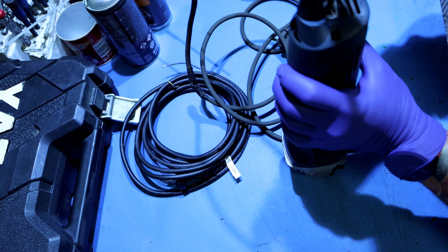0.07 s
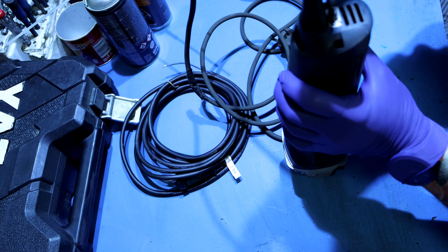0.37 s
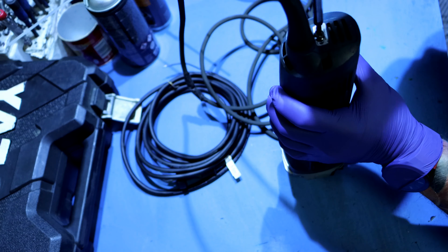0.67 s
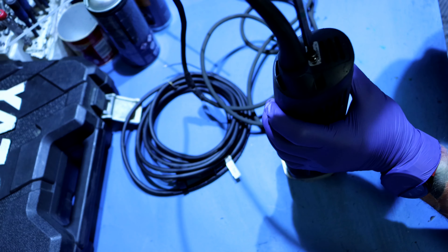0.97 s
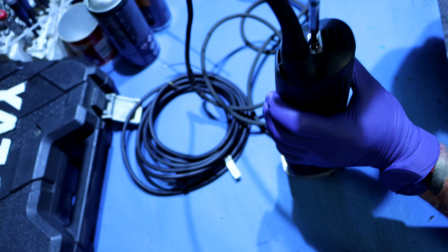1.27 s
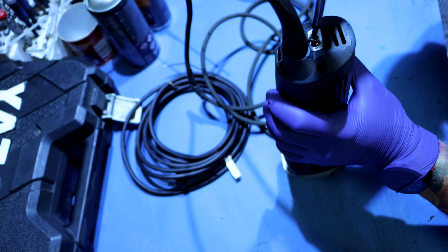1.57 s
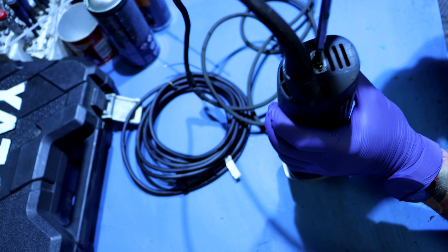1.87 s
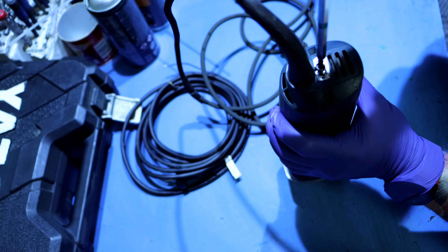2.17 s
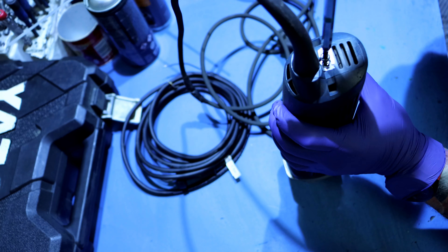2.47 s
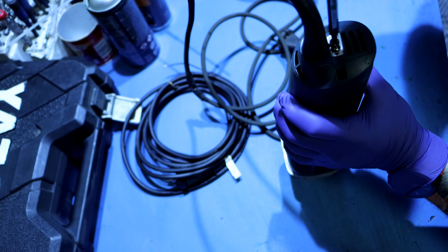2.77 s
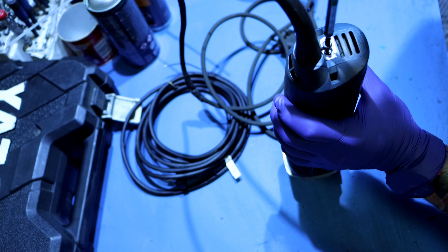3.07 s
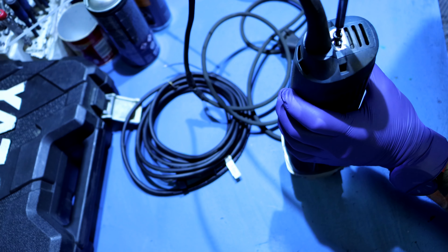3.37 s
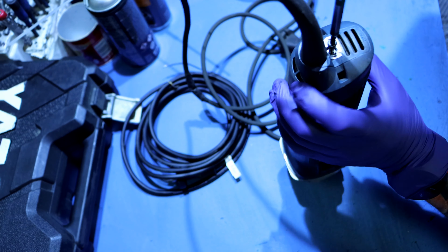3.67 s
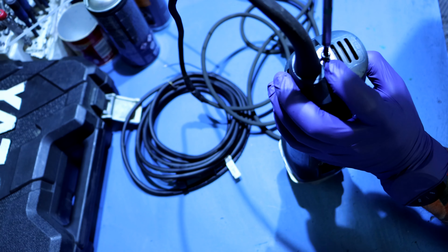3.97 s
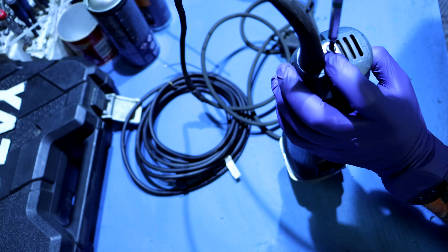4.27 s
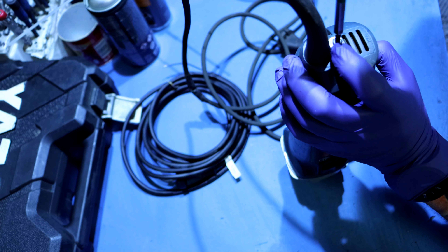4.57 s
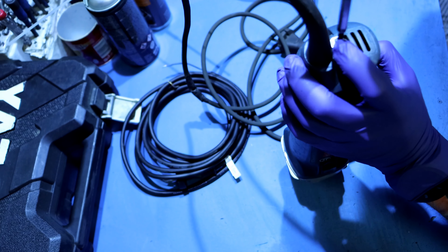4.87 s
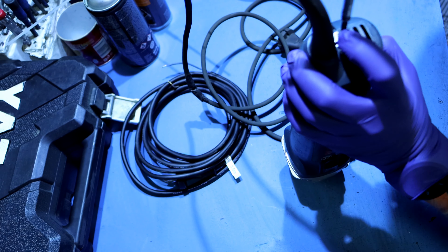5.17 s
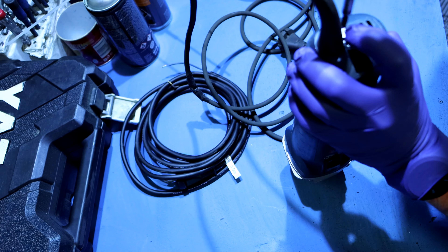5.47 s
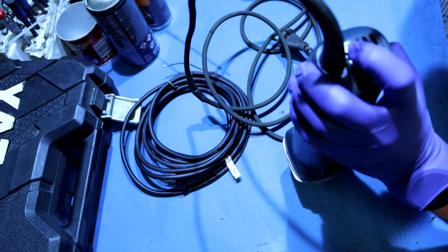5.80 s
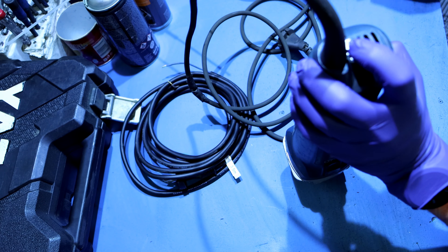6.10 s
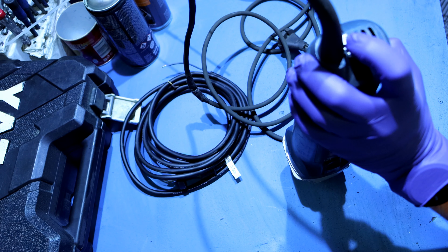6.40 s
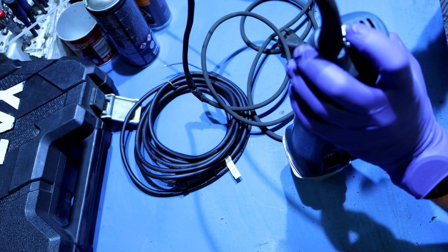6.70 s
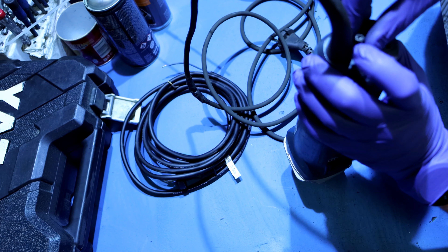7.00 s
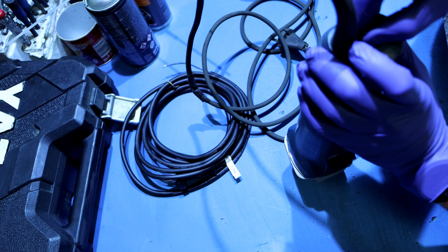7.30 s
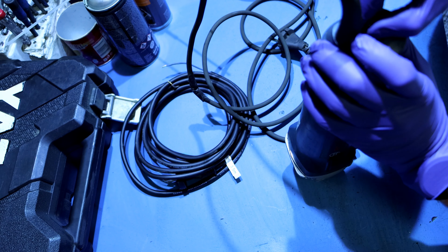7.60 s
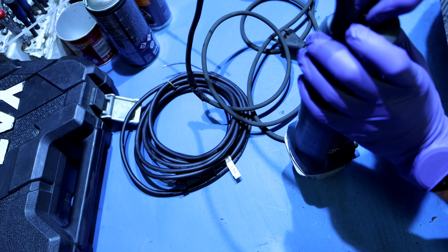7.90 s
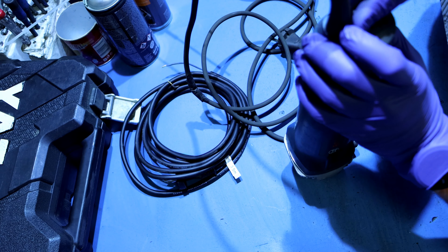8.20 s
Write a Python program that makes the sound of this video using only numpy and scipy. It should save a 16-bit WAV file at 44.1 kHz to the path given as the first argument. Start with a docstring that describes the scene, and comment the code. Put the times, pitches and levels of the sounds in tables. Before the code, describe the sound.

From the start, a rubber glove slides over a screwdriver handle in short, uneven, raspy hisses, several a second, as a screw is backed out of a plastic tool housing. The tip clicks in the screw and the housing rocks with light knocks, the strongest at about 0.5 seconds, growing softer after 3 seconds. Tiny steel ticks and a few faint, brief groans of the housing slipping on the bench come in between. The twisting stops at about 5.4 seconds, leaving a tick, scattered rubs and a faint low drone that swells a little. At about 6.5 seconds the screwdriver lands on the bench with a sharp, quickly bouncing clatter, the loudest sound. Sparse, quiet clicks and glove rubs follow as fingers work the screw until about 8.4 seconds. Everything is close, in a small room with a short echo.

```python
"""Backing out a screw

A gloved hand twists a screwdriver, backing a screw out of a plastic tool housing on a bench.
Each twist hisses as the glove slides over the handle; the tip clicks in the screw and the housing rocks.
The screwdriver is then put down with a clatter, and fingers go on working at the screw.
The room is small, with a short echo and a low drone."""
import sys
import numpy as np
from scipy import signal
from scipy.fft import rfft, irfft
from scipy.io import wavfile
from scipy.ndimage import uniform_filter1d

SR = 44100
rng = np.random.default_rng(int(sys.argv[2]) if len(sys.argv) > 2 else 0)


def unload_audio(sound):
    """Save the sound as a 16-bit wav file, at the path given as the first command line argument."""
    columns = np.transpose(np.atleast_2d(sound))
    # keep every value between -1 and 1, then stretch to whole-number steps
    steps = np.round(np.clip(columns, -1, 1) * 32767)
    wavfile.write(sys.argv[1], SR, steps.astype(np.int16))


N = 372644
TURNING_ENDS_S = 5.4

# the glove slides over the handle, later over the screw:
# (start [s], length [s], hiss level [dB], rasp compared with the hiss [dB])
GLOVE_SLIDES = [(0, 0.077, -32.5, -4.5), (0.194, 0.15, -26.5, -7), (0.341, 0.13, -35.5, -6.5),
                (0.551, 0.181, -31.5, -9.5), (0.721, 0.11, -34, -8), (0.817, 0.088, -49, -2),
                (0.943, 0.15, -29.5, -6), (1.096, 0.11, -34, -6), (1.296, 0.07, -33, -5),
                (1.32, 0.17, -33, -10.5), (1.469, 0.1, -34, -8.5), (1.667, 0.12, -28, -6),
                (1.76, 0.028, -24, -32), (1.814, 0.14, -33.5, -6.5), (1.944, 0.048, -35.5, -5),
                (2.049, 0.15, -26, -12.5), (2.179, 0.142, -35, -8), (2.303, 0.05, -40.5, -6),
                (2.388, 0.19, -31, -7.5), (2.539, 0.15, -35, -6), (2.692, 0.21, -31, -9.5),
                (2.759, 0.042, -19.5, -27), (2.905, 0.078, -38, -6), (2.974, 0.13, -39.5, -6),
                (3.088, 0.063, -27.5, -15.5), (3.156, 0.015, -27, -21), (3.198, 0.12, -39.5, -6.5),
                (3.338, 0.15, -38.5, -10), (3.452, 0.034, -24.5, -14.5), (3.529, 0.019, -41, -14),
                (3.56, 0.094, -38.5, -9.5), (3.665, 0.093, -28.5, -6.5), (3.691, 0.201, -21.5, -13),
                (3.908, 0.08, -41, -5), (3.997, 0.14, -43.5, -3.5), (4.121, 0.04, -23.5, -16),
                (4.254, 0.038, -42, -12), (4.324, 0.21, -40, -10), (4.406, 0.067, -28, -15),
                (4.552, 0.065, -38, -10.5), (4.642, 0.1, -40.5, -12), (4.703, 0.108, -25, -17),
                (4.888, 0.19, -37.5, -9.5), (5.039, 0.042, -29, -14), (5.065, 0.11, -33.5, -12),
                (5.163, 0.19, -35, 1), (5.512, 0.049, -32, -10), (5.757, 0.16, -45.5, 0),
                (5.917, 0.12, -38.5, -4.5), (6.019, 0.22, -51.5, 1.5), (6.38, 0.26, -34.5, -11),
                (6.954, 0.037, -45, 0.5), (6.983, 0.076, -42.5, -3.5), (8.13, 0.13, -50, -6.5),
                (8.282, 0.12, -53, -5)]
# tone of the glove's fine, coarse and thinnest slips: (frequency [Hz], relative level [dB])
HISS_SPECTRUM = [(2500, -39), (4000, -20.5), (6000, -11), (7000, -8.5), (7800, -6), (8700, -3.5),
                 (9600, -2.5), (10400, -4.5), (11200, -8), (13000, -12), (15600, -19)]
RASP_SPECTRUM = [(300, -8), (1000, -19.5), (1800, -4.5), (2500, -3.5), (3200, 3), (3800, 2), (4400, -2.5),
                 (5300, -0.5), (6500, -6), (10000, 2.5), (15000, -22)]
SIZZLE_SPECTRUM = [(6000, -19), (9500, 12), (11000, 2), (13500, 1), (15600, -6)]
# the tip clicks in the screw (hard) and the housing rocks back (soft):
# (time [s], relative strength [dB], hardness [dB per octave])
HOUSING_BLOWS = [(0.012, -33, 1.7), (0.038, -35, 3), (0.38, -46, 3), (0.401, -33, 4), (0.547, -24, 2),
                 (0.729, -45, -2), (0.769, -34.5, 7), (0.938, -41.5, -1.5), (1.151, -38.5, 5),
                 (1.513, -40, 4), (1.852, -51, -1.5), (1.874, -38.5, 2.5), (2.041, -46, -4),
                 (2.212, -52, 4), (2.241, -41, 1.5), (2.387, -44, -3.5), (2.528, -40, 3),
                 (2.597, -49.5, -2), (2.715, -45.5, 0.5), (2.826, -46, 5), (3.075, -46, -1),
                 (3.1, -56.5, -5), (3.336, -50, 3.5), (3.358, -58, -6), (3.487, -55, -3),
                 (3.687, -46.5, -0.5), (4.03, -55.5, -3), (4.12, -57.5, -5), (4.42, -59, -5.5),
                 (5.287, -53, -1), (5.525, -47.5, 6.5), (5.546, -38.5, -1.5), (6.863, -47, 1.5),
                 (7.167, -39, 3), (8.231, -48, 9)]
# the screwdriver lands and bounces, with a relative level for each band:
# (time [s], body [dB], thud [dB], knock [dB], click [dB], clink [dB])
BOUNCES = [(6.488, -15.5, -28, -19, -34, -34), (6.5183, -13, -26, -13.5, -14, -8.5),
           (6.528, -13, -30, -27, -41, -39), (6.5727, -17.5, -30, -23.5, -25.5, -20.5),
           (6.5859, -28.5, -27.5, -34.5, -45, -22)]
# the five bands of a blow, in the order body, thud, knock, click, clink: (from [Hz], to [Hz])
BLOW_BANDS = [(560, 1800), (60, 260), (260, 560), (1800, 6000), (6000, 15500)]
# ringing notes of the plastic housing, and of the bench top with the handle and steel shaft:
# (frequency [Hz], relative level [dB], time to fade by 60 dB [s])
HOUSING_MODES = [(110.3, 2, 0.28), (221, -13, 0.05), (388.6, 0, 0.26), (522, -12.5, 0.11), (622.4, 1, 0.12),
                 (667, 6.5, 0.064), (828, 1.5, 0.078), (940, -16, 0.037), (1026, -5, 0.098),
                 (1052, 1, 0.036), (1210, -22, 0.018), (1384, -5, 0.016), (2320, -14, 0.02),
                 (3138, 0, 0.029), (3390, -6, 0.027), (3670, -2, 0.018)]
BENCH_MODES = [(111.7, 3, 0.26), (199, 2, 0.14), (235, -2.5, 0.22), (329, -6.5, 0.12), (357.3, -3, 0.24),
               (395.4, -0.5, 0.13), (527, -8.5, 0.19), (580, 4, 0.14), (649, -5, 0.22), (726, -3, 0.17),
               (961, 12.5, 0.078), (1038, 9, 0.084), (1150, 4, 0.022), (1280, 0, 0.16), (1580, -11, 0.12),
               (2520, -8.5, 0.073), (2685, -6, 0.044), (2940, -7, 0.035), (3240, -4, 0.031),
               (5170, -3.5, 0.033), (8450, -14, 0.0054), (8700, -9.5, 0.018), (9370, -18, 0.017)]
# their crowded notes blur into a noisy crack: (frequency [Hz], relative level [dB])
HOUSING_CRACK_SPECTRUM = [(60, -5), (108, 8), (155, -31), (210, 1), (290, -10.5), (400, -5), (700, -1.5),
                          (1300, -4), (1650, -9), (2400, -11.5), (3200, -8), (4500, -17), (8000, -20),
                          (15000, -42)]
BENCH_CRACK_SPECTRUM = [(70, -24), (112, -3), (155, -5), (240, 0), (350, 5.5), (680, -5.5), (820, -9),
                        (1020, -8.5), (1700, -20.5), (2650, -9), (4000, -17.5), (7800, -13.5), (8800, -7),
                        (11000, -17.5), (15000, -33)]
# the screw ticks against the tip or in its hole: (time [s], level [dB])
SCREW_TICKS = [(0.93, -33), (1.2916, -37), (1.461, -35), (2.711, -27), (3.0297, -34), (3.077, -28),
               (4.0276, -28), (4.545, -48), (5.528, -25), (5.953, -36.5), (6.678, -33.5), (8.106, -35.5)]
# tone of a tick: (frequency [Hz], relative level [dB])
TICK_SPECTRUM = [(1000, -22), (2500, -9), (3400, -1), (4500, -3), (7000, 0), (10000, -2), (12000, -12),
                 (15000, -22)]
# the housing's base slips on the bench: (start [s], length [s], pitch [Hz], level [dB])
BASE_SLIPS = [(0.077, 0.048, 390, -41), (0.417, 0.088, 225, -37.5), (1.665, 0.06, 420, -48),
              (1.926, 0.047, 410, -42.5), (2.705, 0.054, 390, -42), (4.115, 0.045, 380, -47.5),
              (6.865, 0.045, 400, -40)]
# how long the room echoes: (frequency [Hz], time to fade by 60 dB [s])
ROOM_DECAY = [(100, 0.84), (500, 0.41), (2000, 0.39), (6000, 0.42), (9000, 0.24), (14000, 0.26)]
# the low drone swells and fades: (time [s], relative level [dB])
DRONE_SWELL = [(0.0, -60), (2.2, -60), (3.4, -52), (5.25, -50.5), (5.6, -38.5), (5.97, -37.5),
               (6.14, -48.5), (6.4, -40), (7.1, -43), (8.45, -52.5)]
# tone of the room noise: (frequency [Hz], relative level [dB])
AIR_SPECTRUM = [(20, -11.5), (55, -14), (80, -5.5), (140, -20.5), (195, -10.5), (300, -17.5), (450, -23.5),
                (700, -23.5), (1000, -23.5), (1500, -27), (2600, -32), (6000, -34.5), (10000, -40),
                (15500, -34.5)]


def glove(speed_power=1.34, creep_turning_db=-53, creep_after_db=-60, creep_rasp_db=-4.5):
    """Rubber slides over handle and screw: fine slips hiss, coarser ones rasp, and the grip judders."""
    # between slides the grip still creeps a little
    creep_db = creep_after_db + (creep_turning_db - creep_after_db) * turning()
    hiss_power = amp(creep_db + 3 * wander(rate_hz=9.6)) ** 2
    rasp_power = hiss_power * amp(creep_rasp_db) ** 2
    for start, length, db, rasp_db in GLOVE_SLIDES:
        speed = signal.windows.cosine(round(length * SR))  # speeds up, then slows down
        power = (amp(db) * speed ** speed_power) ** 2
        add(hiss_power, start, power)
        add(rasp_power, start, power * amp(rasp_db) ** 2)
    hiss_power, rasp_power = stretched(hiss_power), stretched(rasp_power)
    # as the grip lightens, the rasp gives way to a thin sizzle
    sizzle_gain = amp(np.clip(-16 - 4 * np.log10(rasp_power / hiss_power), -20, -9))
    hiss = coloured(slips(per_s=22000, spread_db=1.5), HISS_SPECTRUM)
    sizzle = coloured(slips(per_s=18000, spread_db=6.5), SIZZLE_SPECTRUM)
    hiss = patchy(hiss + sizzle_gain * sizzle, depth_db=2.5) * np.sqrt(hiss_power)
    rasp = coloured(slips(per_s=9000, spread_db=1.2), RASP_SPECTRUM)
    rasp = patchy(rasp, depth_db=2) * np.sqrt(rasp_power)
    judder_db = 1.27 * wander(rate_hz=78) + 1.64 * wander(rate_hz=39)
    return (hiss + rasp) * amp(judder_db)


def slips(per_s, spread_db):
    """Rubber sticks and lets go over and over, making tiny pops of uneven size."""
    size = amp(spread_db * np.minimum(rng.exponential(1, N), 4))
    return size * rng.standard_normal(N) * (rng.random(N) < per_s / SR)


def stretched(power, stretch_s=0.035, stretch_db=-8.5):
    """Rubber stretches before a slide and relaxes after it, which softens both ends."""
    window = signal.windows.hann(2 * round(stretch_s * SR))
    return power + amp(stretch_db) ** 2 * abs(signal.oaconvolve(power, window / window.sum(), "same"))


def patchy(x, depth_db):
    """The spot where the glove touches keeps shifting, so some pitches grow louder and others duller."""
    frames = signal.stft(x, SR, nperseg=512, noverlap=384)[2]
    patches = uniform_filter1d(rng.standard_normal(frames.shape), size=9, axis=0)  # smooth over pitch
    patches = uniform_filter1d(patches, size=12, axis=1)  # and over time
    frames *= amp(depth_db * unit(patches))
    return unit(signal.istft(frames, SR, nperseg=512, noverlap=384)[1][:N])


def housing_clicks(band_db=(0, -3, -5, -9, -29)):
    """The tip shifts in the screw head and the housing rocks; a harder contact sounds brighter."""
    out, response = np.zeros(N), band_response(HOUSING_CRACK_SPECTRUM, lag_s=0.00261)
    octaves_above_body = np.log2(BLOW_BANDS).mean(1) - np.log2(BLOW_BANDS[0]).mean()
    for start, db, hardness in HOUSING_BLOWS:
        levels_db = db + hardness * octaves_above_body + band_db
        blow = strike(HOUSING_MODES, response, levels_db, wave_db=-1, rise_cycles=0.88, uneven_db=5,
                      crack_db=(0, -9, 7, -1, 0), crack_fade_s=(0.092, 0.3, 0.12, 0.062, 0.02))
        add(out, start, blow)
    return out


def screwdriver_clatter(gain_db=-1):
    """The handle meets the bench, the shaft slaps down after it, and both bounce."""
    out, response = np.zeros(N), band_response(BENCH_CRACK_SPECTRUM, lag_s=0.000804)
    for start, *levels_db in BOUNCES:
        blow = strike(BENCH_MODES, response, levels_db, wave_db=-9, rise_cycles=0.22, uneven_db=2,
                      crack_db=(0, -11.5, 2, 0, -3), crack_fade_s=(0.19, 0.18, 0.19, 0.16, 0.042))
        add(out, start, blow)
    return amp(gain_db) * out


def strike(modes, response, levels_db, crack_db, crack_fade_s, wave_db, rise_cycles, uneven_db):
    """One blow, built band by band: a first wave, clear ringing notes and a noisy crack."""
    t = np.arange(SR // 2) / SR
    hz, db, ring_s = np.transpose(modes)[:, :, None]
    db = db + uneven_db * rng.standard_normal(hz.shape)
    notes = amp(db - 60 * t / ring_s) * np.sin(2 * np.pi * (hz * t + rng.random(hz.shape)))
    out, offset = np.zeros(len(t)), rng.integers(SR, N - SR)
    bands = zip(BLOW_BANDS, response, levels_db, crack_db, crack_fade_s)
    for (low, high), (wave, noise), level_db, share_db, fade_s in bands:
        centre_hz = np.sqrt(low * high)
        attack = slice(round(SR * max(0.01, 4 / centre_hz)))  # the parts are balanced over this opening
        ring = notes[(hz[:, 0] >= low) & (hz[:, 0] < high)].sum(0)
        crack = noise[offset:offset + len(t)] * amp(-60 * t / fade_s)
        tail = ring / (ring[attack].std() + 1e-9) + amp(share_db) * crack / crack[attack].std()
        tail *= 1 - np.exp(-t * centre_hz / rise_cycles)  # the ringing builds up as the wave reflects
        first_wave = amp(wave_db) * wave[:len(t)] / wave[attack].std()
        out += amp(level_db) * (tail / tail[attack].std() + first_wave)
    return out


def band_response(spectrum, lag_s):
    """How a tapped object answers in each band: a first bending wave, and noise for its crowded notes."""
    hz = np.fft.rfftfreq(N, 1 / SR)
    # low bending waves travel slower (lag_s is the travel time at 1 kHz), so a tap falls in pitch
    travel_s = lag_s * np.sqrt(1000 / (hz + 1))
    wave = irfft(np.exp(-2j * np.pi * np.cumsum(travel_s - travel_s[-1]) * hz[1]), N)
    wave_and_noise = [coloured(wave, spectrum), coloured(rng.standard_normal(N), spectrum)]
    filters = [signal.butter(3, edges, "band", fs=SR, output="sos") for edges in BLOW_BANDS]
    return [signal.sosfilt(band, wave_and_noise) for band in filters]


def screw_ticks(fade_s=0.01):
    """Light steel-on-steel touches that die away at once."""
    loudness, t = np.zeros(N), np.arange(SR // 20) / SR
    for start, db in SCREW_TICKS:
        add(loudness, start, amp(db - 60 * t / fade_s))
    return loudness * coloured(rng.standard_normal(N), TICK_SPECTRUM)


def base_groans(jitter_cycles=0.15):
    """The housing's base sticks and slips on the bench, making short, rough groans."""
    out, t = np.zeros(N), np.arange(N) / SR
    jitter = jitter_cycles * wander(rate_hz=104)
    for start, length, hz, db in BASE_SLIPS:
        progress = np.clip((t - start) / length, 0, 1)
        swell = np.sin(np.pi * progress ** 0.45)  # peaks early
        out += amp(db) * swell * unit(np.sin(2 * np.pi * (hz * t + jitter)))
    return out


def thread_grumble(level_db=-57, width_hz=26, swing_db=3):
    """The turning screw thread keeps the housing's lowest note stirring."""
    lowest_hz = HOUSING_MODES[0][0]
    resonance = signal.iirpeak(lowest_hz, lowest_hz / width_hz, SR)
    stirred = unit(signal.lfilter(*resonance, signal.lfilter(*resonance, rng.standard_normal(N))))
    return stirred * amp(level_db + swing_db * wander(rate_hz=1.9)) * turning()


def room_echo(x, delay_s=0.0049):
    """Scattered reflections from the walls, each pitch dying away at its own speed."""
    reflections = rng.standard_normal(SR) * (rng.random(SR) < 0.1) * (np.arange(SR) > delay_s * SR)
    hz, t, frames = signal.stft(reflections, SR, nperseg=256)
    frames *= amp(-60 * t / value_at(ROOM_DECAY, hz)[:, None])
    tail = signal.istft(frames, SR, nperseg=256)[1]
    return signal.fftconvolve(x, tail / np.linalg.norm(tail))[:N]


def background(drone_hz=50, drone_gain_db=-1, air_db=-49, whine_hz=12550, whine_db=-68):
    """A wavering low drone, nearly steady room noise and a faint, fuzzy whine."""
    t = np.arange(N) / SR
    drone = unit(np.sin(2 * np.pi * (drone_hz * t + 0.041 * wander(rate_hz=13.4))))
    drone *= amp(np.interp(t, *np.transpose(DRONE_SWELL)) + drone_gain_db + 2 * wander(rate_hz=5.7))
    air = coloured(rng.standard_normal(N), AIR_SPECTRUM) * amp(air_db - 0.8 * wander(rate_hz=3.4))
    whine = amp(whine_db) * unit(wander(rate_hz=460) * np.sin(2 * np.pi * whine_hz * t))
    return drone + air + whine


def turning():
    """1 while the screwdriver is worked, easing to 0 as the hand stops."""
    return np.clip((TURNING_ENDS_S - np.arange(N) / SR) / 0.1, 0, 1)


def amp(db):
    """Turns decibels into a gain."""
    return 10 ** (np.asarray(db) / 20)


def unit(x):
    """Scales x to an average power of 1."""
    return x / np.sqrt(np.mean(x ** 2) + 1e-20)


def value_at(points, hz):
    """Reads between a table's points on a log-frequency scale."""
    point_hz, values = np.transpose(points)
    return np.interp(np.log(hz + 1), np.log(point_hz), values)


def coloured(x, spectrum):
    """Shapes the tone of x with a spectrum, at power 1."""
    return unit(irfft(rfft(x) * amp(value_at(spectrum, np.fft.rfftfreq(N, 1 / SR))), N))


def wander(rate_hz):
    """A smooth random wobble, mostly slower than rate_hz, at power 1."""
    hz = np.fft.rfftfreq(N, 1 / SR)
    return unit(irfft(rfft(rng.standard_normal(N)) / (1 + (hz / rate_hz) ** 4), N))


def add(mix, start_s, sound):
    """Adds a sound to the mix at a given time."""
    part = mix[max(round(start_s * SR), 0):][:len(sound)]
    part += sound[:len(part)]


def scene(hit_echo_db=-13, glove_echo_db=-19):
    """Blows and rubbing, heard from close by in a small room."""
    hits = housing_clicks() + base_groans() + screw_ticks() + screwdriver_clatter()
    rubbing = glove()
    echo = room_echo(amp(hit_echo_db) * hits + amp(glove_echo_db) * rubbing)
    return (hits + rubbing + thread_grumble() + echo + background())[None]


def record(dry, cutoff_hz=15830):
    """Clips the loudest knock at full scale, then cuts the highest treble."""
    lowpass = signal.firwin(511, cutoff_hz, window=("kaiser", 9), fs=SR)
    return signal.oaconvolve(np.clip(dry, -1, 1), lowpass[None], "same")


dry = scene()
out = record(dry)
unload_audio(out)
```